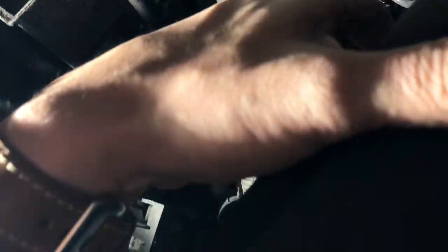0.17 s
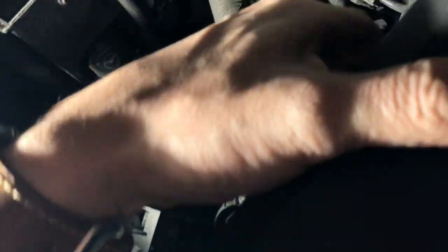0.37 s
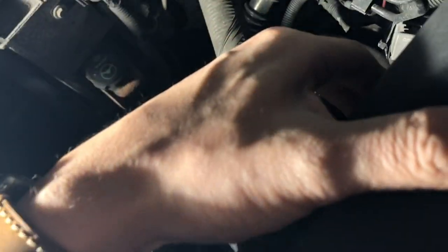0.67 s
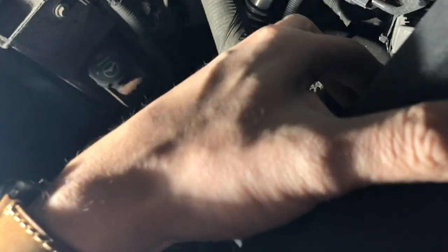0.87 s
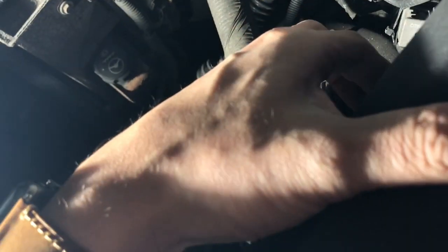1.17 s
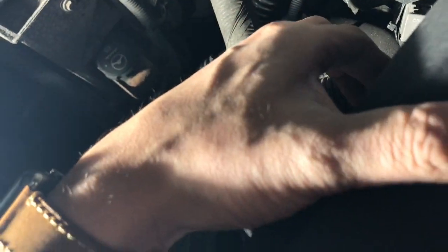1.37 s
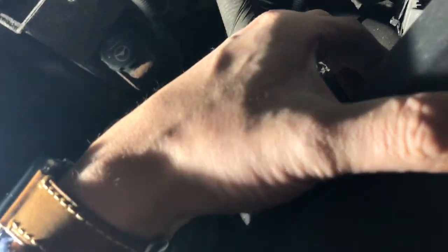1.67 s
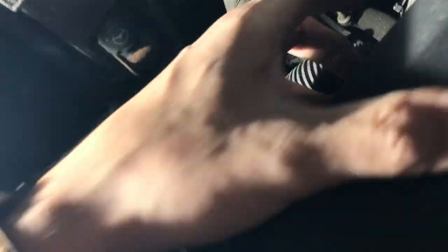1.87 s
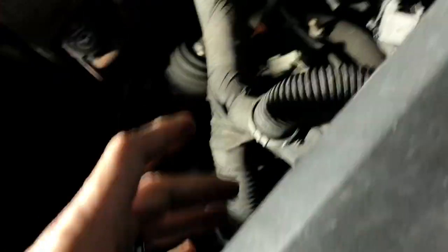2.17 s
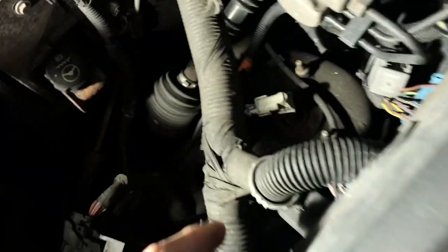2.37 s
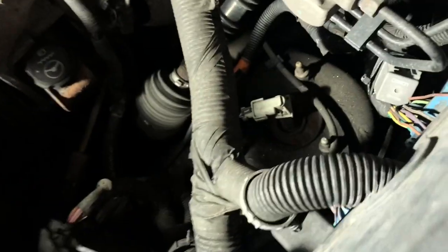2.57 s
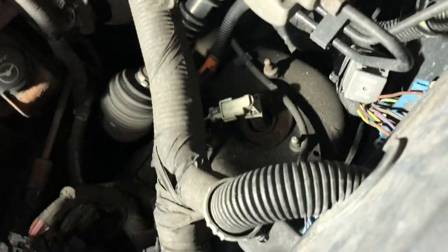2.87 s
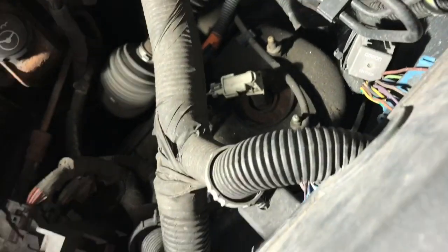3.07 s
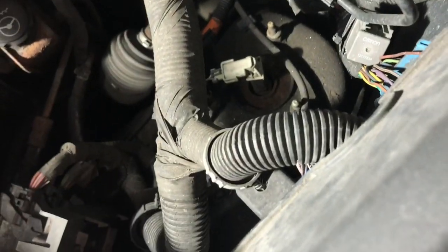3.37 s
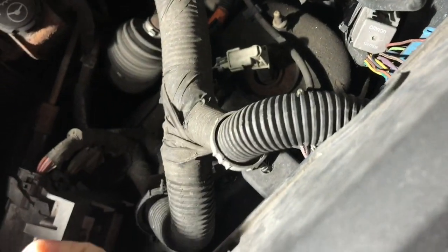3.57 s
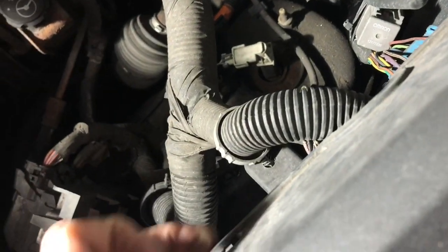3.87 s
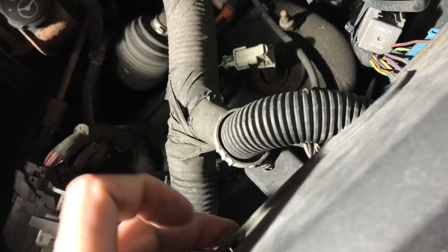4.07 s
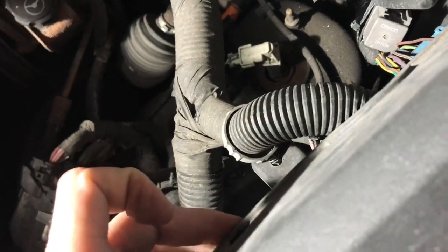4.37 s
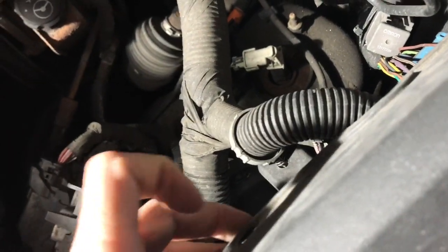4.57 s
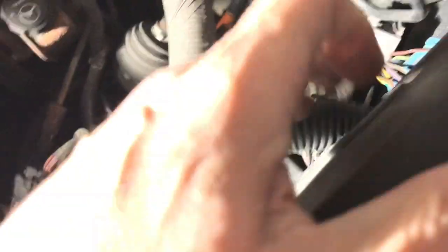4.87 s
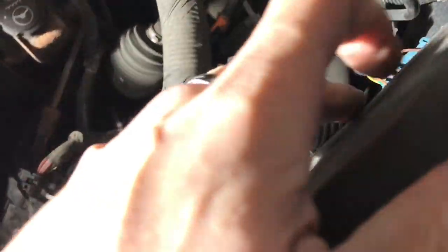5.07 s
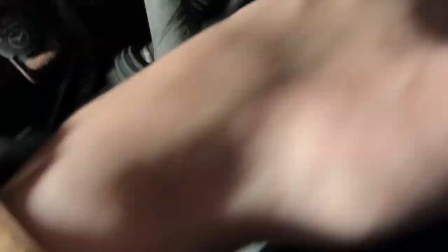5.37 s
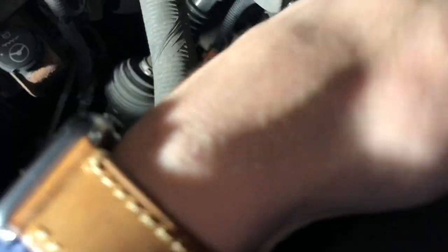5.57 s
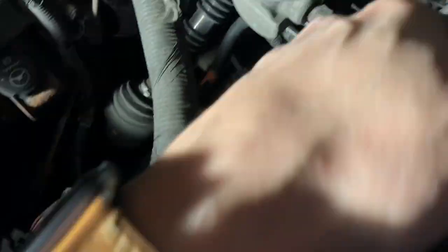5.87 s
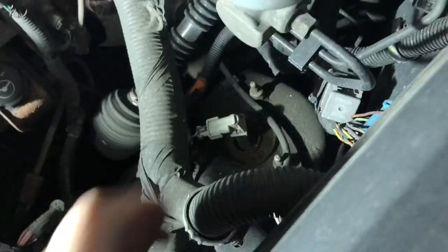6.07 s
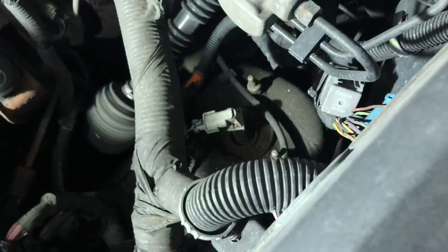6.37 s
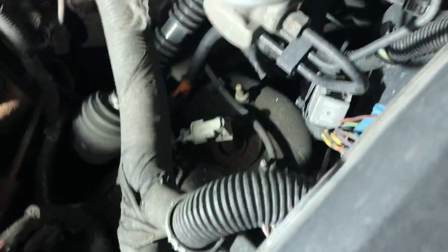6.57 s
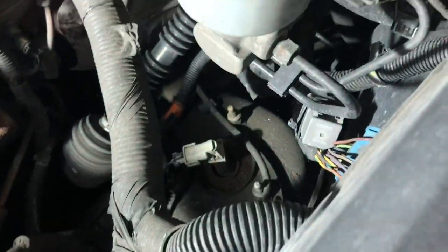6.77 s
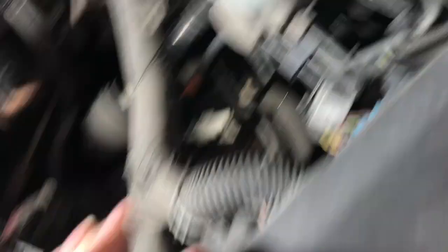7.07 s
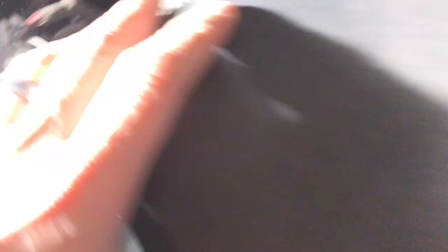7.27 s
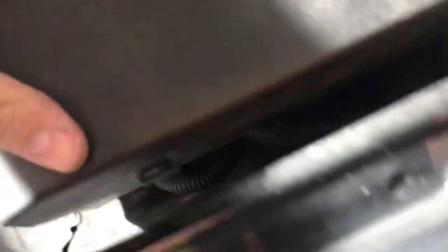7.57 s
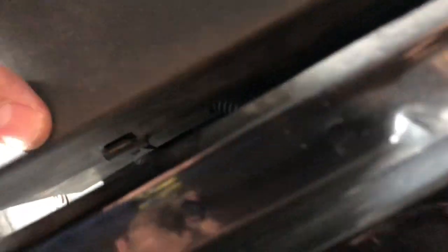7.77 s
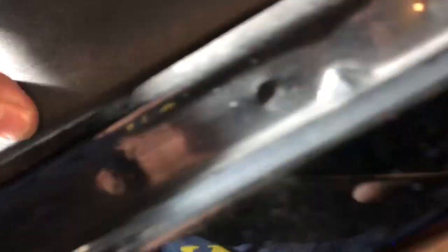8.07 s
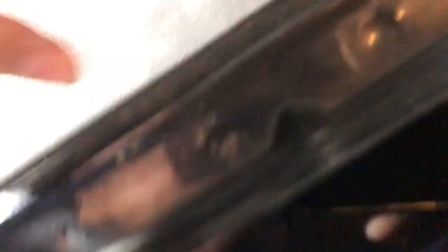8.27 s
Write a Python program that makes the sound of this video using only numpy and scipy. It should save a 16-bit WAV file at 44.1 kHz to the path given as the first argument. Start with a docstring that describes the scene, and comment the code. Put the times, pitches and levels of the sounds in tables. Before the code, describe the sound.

A hand presses and rubs a plastic vehicle panel up close, then knocks it home five times with clicks and hollow thumps.

```python
"""A dull thump comes first: a palm pushes on a plastic dash panel, close to a phone in a parked vehicle.
Taps and sliding skin follow, then five blows knock the panel back into place. Each contact clicks at the
edge, clacks the plastic and sets the whole panel thumping; the small cabin answers. A spring clip pings
once, the hardest knocks overload the microphone, and a faint rumble comes in from outside."""
import sys
import numpy as np
from scipy import signal
from scipy.fft import rfft, irfft, next_fast_len
from scipy.io import wavfile
from scipy.ndimage import uniform_filter1d, minimum_filter1d, map_coordinates

SR = 44100
rng = np.random.default_rng(int(sys.argv[2]) if len(sys.argv) > 2 else 0)


def dump_mix(stems):
    """Bounce the given channels to the path in sys.argv[1] as a 16-bit WAV at rate SR."""
    frames = np.atleast_2d(stems).T  # one column per channel
    limited = np.clip(frames, -1, 1)  # hard clip at full scale
    pcm = np.round(limited * 32767).astype(np.int16)
    wavfile.write(sys.argv[1], SR, pcm)


N = 370881
T = np.arange(SR // 2) / SR  # time within one contact, in seconds
PALM_CLACK_DB = -10.5  # a padded hand hardly clacks

# Blows on the dash, close to the microphone. Hardness raises the edge click over the thump.
# start_s, strength_db, hard_db, clack_db, hand_lead_s, scrape_db,
# seat_delay_s, seat_db, seat_hard_db, thump_hz, cabin_db
PANEL_BLOWS = [(4.294, -10, 1.5, -6, 0.027, -31.5, 0.022, -5.5, 4, 290, -8),
               (4.8138, -10, 1.5, -5, 0.027, -23, 0.009, -5, 7, 300, -8),
               (5.6525, -9, 9, -1.5, 0.032, -39.5, 0.017, -9, 3.5, 252, -4),
               (6.5938, -15.5, 20, -2.5, 0.0095, -40, 0.004, -9.5, -2.5, 343, 1.5),
               (7.9705, -7.5, 14, 0, 0.028, -29, 0.0096, -7.5, 14.5, 242, 0)]


def blows():
    """The hand lands, the edge scrapes up the catch and strikes, then the panel seats and rebounds."""
    out = np.zeros(N)
    hand_db, hand_hard_db = -14.5, -14
    rebound_s, rebound_db, rebound_hard_db = 0.018, -11.5, -19
    for (start_s, db, hard_db, clack_db, lead_s, scrape_db,
         seat_delay_s, seat_db, seat_hard_db, thump_hz, cabin_db) in PANEL_BLOWS:
        landing_s, seated_s = start_s - lead_s, start_s + seat_delay_s
        tone = (clack_db, thump_hz, cabin_db)
        add(out, landing_s, contact(db + hand_db, hand_hard_db, *tone))
        add(out, landing_s, rub(lead_s + 0.013, scrape_db, swell_db=29, corner_hz=3080))
        add(out, start_s, contact(db, hard_db, *tone))
        add(out, seated_s, contact(seat_db, seat_hard_db, *tone))
        add(out, seated_s + rebound_s, contact(seat_db + rebound_db, rebound_hard_db, *tone))
    return out


# The loose edge against its frame: start_s, strength_db, hard_db, clack_db, thump_hz
EDGE_TAPS = [(0.3377, -51, 6, -4, 334), (0.596, -19.5, -2.5, 0.5, 355), (1.4971, -47, -9, -5, 149),
             (1.8198, -34.5, 9.5, 0, 350), (2.812, -23, -8, -2, 316), (3.5136, -40.5, -5, -12, 317),
             (3.7442, -34.5, -2, -8.5, 256), (4.0534, -33, -8, -9.5, 333), (4.2062, -28, -3, -7.5, 218),
             (4.804, -11.5, 1.5, -5, 298.5), (4.973, -28, 1.5, -3, 283), (5.012, -51, 8.5, 7, 273),
             (5.249, -34, 9, -4, 225), (5.981, -36, -1, -18, 307), (6.5145, -33, 18.5, -4.5, 175),
             (6.575, -34, 10.5, -6, 334), (7.1889, -43, -5, -2.5, 248), (7.2633, -47, 7, -16, 172)]
# The palm on the face of the panel: start_s, strength_db, thump_hz
PALM_PRESSES = [(0.0004, -8, 253), (0.0855, -19, 210), (0.246, -34.5, 180), (0.4053, -45, 179),
                (0.487, -36.5, 170), (0.5303, -29, 347), (0.5459, -19, 305), (0.5533, -19.5, 317),
                (0.6258, -19.5, 304), (0.8784, -25, 191), (3.17, -35, 177), (3.3759, -39.5, 184),
                (3.5612, -40.5, 310), (3.8066, -38, 204), (3.9999, -36, 200), (5.3266, -27, 340),
                (5.3845, -37.5, 373), (5.5566, -36.5, 309), (6.104, -31.5, 179), (6.4674, -32, 171.5)]


def taps_and_presses():
    """The loose edge taps its frame and the palm pushes the panel, each with a short skid."""
    out = np.zeros(N)
    skid_lead_s = 0.014
    for start_s, db, hard_db, clack_db, thump_hz in EDGE_TAPS:
        add(out, start_s - skid_lead_s, rub(length_s=0.029, db=db - 22, swell_db=0, corner_hz=4400))
        add(out, start_s, contact(db, hard_db, clack_db, thump_hz, cabin_db=-4.5))
    for start_s, db, thump_hz in PALM_PRESSES:
        add(out, start_s - skid_lead_s, rub(length_s=0.074, db=-62.5, swell_db=0, corner_hz=1575))
        press = contact(db, hard_db=-27, clack_db=PALM_CLACK_DB, thump_hz=thump_hz, cabin_db=-1)
        add(out, start_s, press)
    return out


def contact(db, hard_db, clack_db, thump_hz, cabin_db):
    """The edge clicks first, the plastic around it clacks, and the heavy panel follows."""
    attack_s = 0.0006 * 2 ** np.clip(-hard_db / 9, -2, 3)  # padded contacts build up slowly
    body = amp(clack_db) * clack(hard_db, attack_s) + thump(hard_db, thump_hz)
    edge = amp(hard_db - 14) * click(db, hard_db, attack_s, cabin_db)
    return amp(db - 4.0) * (edge + cabin(body, cabin_db))


# The panel edge on its catch, heard close up: frequency_hz, level_db
CLICK_SPECTRUM = [(500, -25), (1500, 4), (2500, -0.5), (4300, -1), (6500, 3), (9000, -0.5), (12000, -5),
                  (16000, -11.5)]


def click(db, hard_db, attack_s, cabin_db):
    """One crack, then the edge chatters over the catch; the cabin returns a hiss of the same colour."""
    centre_hz = 2780 * 2 ** (-0.009 * db)  # lighter contacts click higher
    t60_s = 0.051 * 2 ** (-0.0643 * hard_db)  # harder clicks are over sooner
    colour = lambda hz: unit(amp(along(CLICK_SPECTRUM, hz)) * focus(hz, centre_hz, slope_db=5.0))
    crack = amp(17 + 1.55 * db) * fade(0.0016, attack_s / 3)  # grows with the force
    chatter = amp(6.0 * wobble(1100, len(T))) * fade(t60_s, attack_s)
    direct = unit(filtered(rng.standard_normal(len(T)), colour) * (crack + chatter), size=330)
    return direct + amp(cabin_db) * np.linalg.norm(direct) * filtered(cabin_tail(), colour)


# Crowded modes of the plastic around the contact: frequency_hz, level_db
CLACK_SPECTRUM = [(200, -25), (500, -1.5), (950, 1), (1400, -5.5), (2200, -15.5), (3500, -17),
                  (7000, -40.5)]
# Stiff local modes of the plastic: pitch_hz, level_db, t60_s
SHELL_MODES = [(590, -4, .05), (700, 1, .06), (860, -5, .05), (960, 0, .05), (1205, -1, .05),
               (1470, -2, .045), (1690, -6, .04), (1916, -6, .04), (2210, -1, .04), (2790, -5, .03),
               (3520, -12, .025)]


def clack(hard_db, attack_s):
    """A few strong modes stand out of many crowded, quickly damped ones."""
    centre_hz = 900 * 2 ** (0.06 * hard_db)  # harder contacts clack higher
    slope_db = 7.5 + 0.07 * min(hard_db, 0)
    plastic = filtered(noise(CLACK_SPECTRUM, len(T)), lambda hz: focus(hz, centre_hz, slope_db - 6))
    crowded = plastic * amp(1.4 * wobble(1100, len(T))) * fade(0.054, attack_s)
    shell = ring(SHELL_MODES, attack_s, scatter_db=4.5, centre_hz=centre_hz, slope_db=slope_db)
    return unit(unit(shell, size=660) + 1.72 * unit(crowded, size=660), size=660)


# The low shove of the hand into the dash: frequency_hz, level_db
PUSH_SPECTRUM = [(20, -28), (40, -15), (62, 7.5), (100, -3), (170, 3.5), (350, 8), (550, -2.5), (1000, -44)]
# Bending of the whole panel: pitch_hz, level_db, t60_s
BENDING_MODES = [(107.7, -14, 0.39), (144.9, -3.5, 0.19), (179.1, -1, .14), (210.5, -3.5, 0.13),
                 (282.3, -1.5, 0.1), (333.7, 0.5, 0.094), (366, 2, 0.078), (443.6, -6, 0.09),
                 (517, -1.5, 0.083)]


def thump(hard_db, centre_hz):
    """The hand's push bends the whole panel."""
    rise_s = 0.007 * 2 ** (0.12 * hard_db)  # the panel lags further behind a hard contact
    push = unit(noise(PUSH_SPECTRUM, len(T)) * fade(0.094, rise_s), size=1100)
    bend = ring(BENDING_MODES, rise_s, scatter_db=2.5, centre_hz=centre_hz, slope_db=7.5)
    onset = 1 - np.exp(-T / 0.0015)
    return unit((unit(bend, size=1100) + 0.39 * push) * onset, size=1100)


def ring(modes, attack_s, scatter_db, centre_hz, slope_db):
    """Struck modes; the grip of the hand varies the sign, strength and pitch of each one."""
    out = np.zeros(len(T))
    for hz, db, t60_s in modes:
        side, strength, detune = rng.standard_normal(3)
        gain = np.sign(side) * amp(db + scatter_db * strength) * focus(hz, centre_hz, slope_db)
        out += gain * fade(t60_s, attack_s) * np.sin(2 * np.pi * hz * (1 + .012 * detune) * T)
    return out


def focus(hz, centre_hz, slope_db):
    """Gain of a blow that strikes centre_hz best and slope_db less for each octave away."""
    return amp(-slope_db * np.abs(np.log2((hz + 1) / centre_hz)))


# The hand sliding over the dash, near the microphone: start_s, end_s, level_db, swell_db, corner_hz
HAND_STROKES = [(0.053, 0.137, -52, -19, 8700), (0.533, 0.676, -52, -5, 8650),
                (0.828, 0.882, -45.5, 14, 8600), (1.051, 1.135, -55.5, 11, 2800),
                (1.845, 2.067, -46.5, 17.5, 13600), (2.035, 2.24, -52.5, -25, 5400),
                (2.667, 2.721, -49, 0, 9800), (2.745, 2.813, -53, 32, 9200), (2.94, 3.007, -59.5, -2, 6900),
                (3.922, 4.116, -49.5, 3.5, 11040), (4.169, 4.192, -56.5, -8.5, 8110),
                (4.65, 4.733, -53, 15, 8500), (4.73, 4.798, -46.5, 17, 2500), (4.778, 4.99, -46, -3, 13270),
                (5.049, 5.181, -53.5, 10, 3150), (5.252, 5.397, -53, -0.5, 16000),
                (5.533, 5.559, -53, 8, 13100), (5.942, 6.108, -43.5, -6, 13600),
                (6.071, 6.163, -38, 4.5, 15300), (6.147, 6.22, -47, 4, 13000),
                (6.218, 6.339, -49.5, -0.5, 10650), (6.331, 6.389, -48.5, -7.5, 11600),
                (6.453, 6.547, -53, 6, 10230), (7.062, 7.138, -48, 4, 10000),
                (7.224, 7.302, -54, 15.5, 9200), (7.403, 7.474, -57, 4.5, 7950),
                (7.653, 7.701, -61.5, -2, 8970)]
# Fingers shifting their grip, faint even this close: start_s, end_s, level_db
GRIP_SHIFTS = [(0.682, 0.876, -74), (2.149, 2.664, -64), (3.05, 3.944, -73.5), (4.434, 4.507, -64.5),
               (6.855, 7.075, -63), (7.288, 7.652, -68.5), (8.218, 8.4, -62)]


def hand_slides():
    """Strokes of the hand, and uneven brushing while the fingers look for a new hold."""
    out = np.zeros(N)
    for start_s, end_s, db, swell_db, corner_hz in HAND_STROKES:
        add(out, start_s, rub(end_s - start_s, db, swell_db, corner_hz))
    for start_s, end_s, db in GRIP_SHIFTS:
        brush = rub(end_s - start_s, db, swell_db=0, corner_hz=7740)
        pressure_db = 7.5 * np.tanh(wobble(31, len(brush)))
        add(out, start_s, brush * amp(pressure_db))
    return cabin(out)


# Friction on the grained face of the dash: frequency_hz, level_db
FRICTION_SPECTRUM = [(60, -8.5), (300, 5), (900, 0.5), (2000, -1), (3200, -2), (6000, -3), (10000, -4),
                     (16000, -7)]


def rub(length_s, db, swell_db, corner_hz):
    """Skin or panel edge drags over grained plastic: a gritty hiss with tiny catches."""
    catches_per_s, catch_db = 130, 5
    spot_db, spot_width_hz = 5, 450  # each rubbed spot has its own resonance
    spot_hz = 5270 * 2 ** (0.3 * rng.standard_normal())
    size = max(round(length_s * SR), 256)
    pressure_db = db + swell_db * np.linspace(-.5, .5, size) + 1.6 * wobble(53, size)
    pressure = amp(pressure_db) * signal.windows.tukey(size, .55)
    snags = 1.0 * (rng.random(size) < catches_per_s / SR)
    catches = signal.fftconvolve(snags, fade(0.0039, 0.0001))[:size]
    hiss = noise(FRICTION_SPECTRUM, size)
    grit = unit(hiss * (amp(1.9 * wobble(900, size)) + amp(catch_db) * catches))
    resonance = lambda hz: amp(spot_db / (1 + ((hz - spot_hz) / spot_width_hz) ** 2))
    return pressure * unit(filtered(grit, lambda hz: resonance(hz) / np.sqrt(1 + (hz / corner_hz) ** 4)))


# The steel spring clip at the panel: pitch_hz, level_db, t60_s
CLIP_MODES = [(750, -10, .15), (1820, -4.5, .07), (2100, -11, 0.045), (3976, -27.5, 0.075),
              (5070, -12, 0.095), (9080, -14, 0.045)]


def spring_clip():
    """A steel clip scrapes free and buzzes against the plastic, which blurs its modes."""
    ping = np.zeros(len(T))
    for hz, db, t60_s in CLIP_MODES:
        buzz = wobble(hz / 6 + 250, len(T))
        ping += amp(db) * fade(t60_s, .004) * buzz * np.sin(2 * np.pi * hz * T)
    out = np.zeros(N)
    add(out, 5.443, amp(-42.5) * unit(ping, size=1100))
    add(out, 5.438, rub(length_s=0.02, db=-47, swell_db=-5.5, corner_hz=10000))
    return cabin(out, wet_db=4.5)


# How long the cabin rings around the microphone: frequency_hz, t60_s
CABIN_DECAY = [(60, .6), (160, 0.34), (420, 0.31), (1100, 0.44), (3000, 0.44), (7000, 0.34), (15000, 0.2)]
# What the cabin sends back to the microphone: frequency_hz, level_db
CABIN_SPECTRUM = [(60, -2.5), (200, -4.5), (500, -6), (1200, -12.5), (3000, -15), (8000, -19), (15000, -16)]


def cabin_tail():
    """The short, bass-heavy answer of the upholstered cabin to one impulse."""
    hz, t, bands = signal.stft(rng.standard_normal(len(T)), SR, nperseg=256)
    t60_s = along(CABIN_DECAY, hz)[:, None]
    decay = amp(-60 * t / t60_s) * np.sqrt(2 * np.log(1000) / (t60_s * SR))  # equal energy per band
    colour = amp(along(CABIN_SPECTRUM, hz))[:, None]
    tail = signal.istft(bands * decay * colour, SR, nperseg=256)[1][:len(T)]
    return tail * (1 - np.exp(-(T / 0.009) ** 2))


def cabin(x, wet_db=0):
    """A sound with the cabin's answer, which returns a steady share of its energy."""
    wet = signal.fftconvolve(x, cabin_tail())[:len(x)]
    returned_rms = np.std(filtered(x, lambda hz: amp(along(CABIN_SPECTRUM, hz))))
    return x + amp(wet_db - 2.47) * returned_rms * unit(wet)


# The outdoors, heard from inside the parked vehicle: frequency_hz, level_db
RUMBLE_SPECTRUM = [(20, -28), (45, -10), (70, -1), (95, 1.5), (140, -8.5), (240, -10.5), (350, -13),
                   (600, -20.5), (1100, -20.5), (2000, -31), (4000, -36.5), (9000, -41), (16000, -47.5)]
# Its slow drift at the microphone: time_s, level_db
RUMBLE_LEVELS = [(0, -54), (1.2, -55.5), (1.7, -56.5), (3, -55), (5, -53), (7.001, -55.5), (8.4, -54.5)]


def outdoor_rumble():
    """Faint, wavering outdoor rumble that reaches the cabin."""
    time_s, db = np.transpose(RUMBLE_LEVELS)
    level_db = np.interp(np.arange(N) / SR, time_s, db) + 1.4 * wobble(9.1, N)
    return amp(level_db) * noise(RUMBLE_SPECTRUM, N)


def amp(db):
    """Decibels to gain."""
    return 10 ** (np.asarray(db) / 20)


def unit(x, size=None):
    """x scaled to rms 1 over its first size samples, or over all of it."""
    return x / np.sqrt(np.mean(x[:size] ** 2) + 1e-20)


def along(points, hz):
    """(frequency_hz, value) points read on a log axis."""
    frequencies, values = np.transpose(points)
    return np.interp(np.log(hz + 1), np.log(frequencies), values)


def filtered(x, gain):
    """x times a gain that depends on frequency."""
    padded = next_fast_len(len(x) + 8192)
    return irfft(rfft(x, padded) * gain(np.fft.rfftfreq(padded, 1 / SR)), padded)[:len(x)]


def noise(spectrum, size):
    """Coloured noise of rms 1."""
    return unit(filtered(rng.standard_normal(size), lambda hz: amp(along(spectrum, hz))))


def wobble(knots_per_s, size):
    """A smooth random curve."""
    return map_coordinates(rng.standard_normal(4096), [np.arange(size) * knots_per_s / SR], mode="wrap")


def fade(t60_s, attack_s):
    """Envelope of something struck."""
    return amp(-60 * T / t60_s) * (1 - np.exp(-T / attack_s))


def add(track, start_s, sound):
    """Mix a sound into the track."""
    start = max(round(start_s * SR), 0)
    track[start:start + len(sound)] += sound[:N - start]


def scene():
    """Everything at one microphone, close to the dash."""
    return (blows() + taps_and_presses() + hand_slides() + spring_clip() + outdoor_rumble())[None]


def record(dry):
    """The phone microphone loses deep bass and top treble; a fast limiter holds the hardest knocks."""
    bottom_hz, top_hz, ceiling = 42, 16000, .98
    x = signal.sosfilt(signal.butter(4, bottom_hz, "highpass", fs=SR, output="sos"), dry[0])
    needed_gain = np.minimum(1, ceiling / (np.abs(x) + 1e-9))
    gain = uniform_filter1d(minimum_filter1d(needed_gain, size=89), size=89)  # 2 ms hold and smoothing
    return filtered(x * gain, lambda hz: 1 / np.sqrt(1 + (hz / top_hz) ** 160))[None]


dry = scene()
out = record(dry)
dump_mix(out)
```